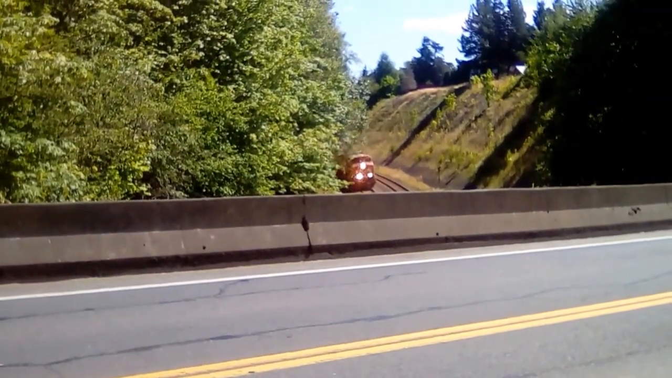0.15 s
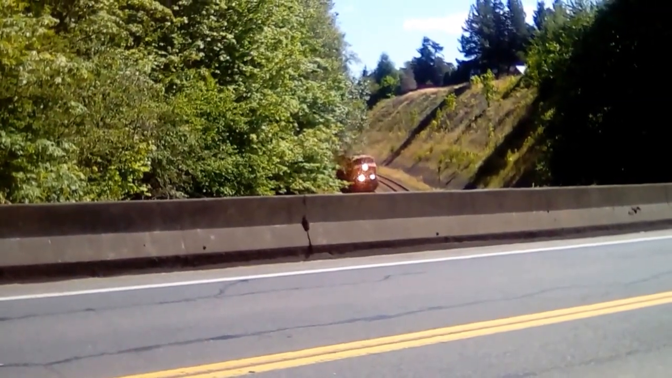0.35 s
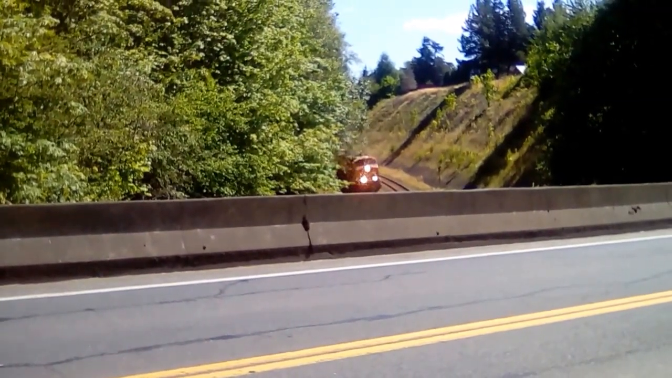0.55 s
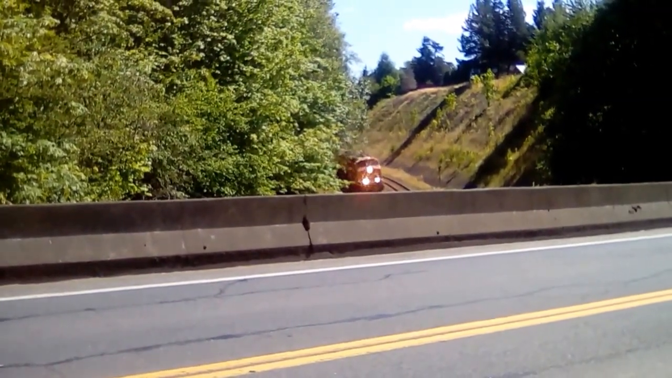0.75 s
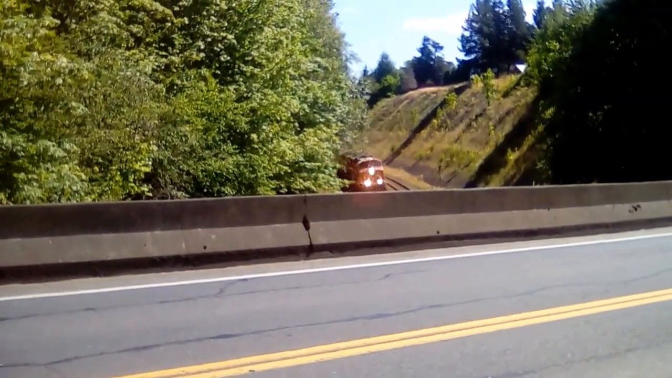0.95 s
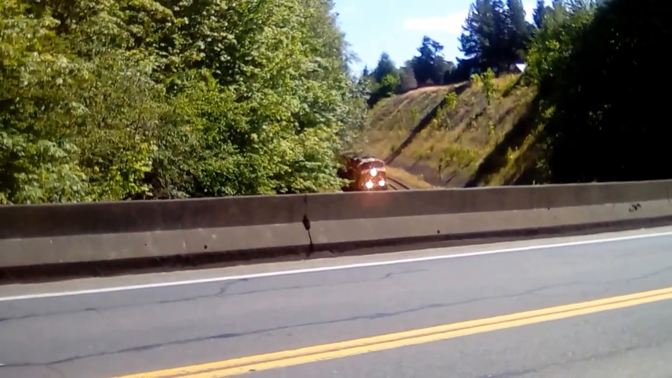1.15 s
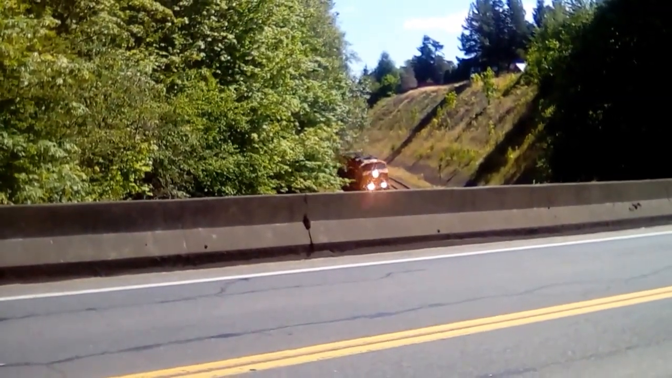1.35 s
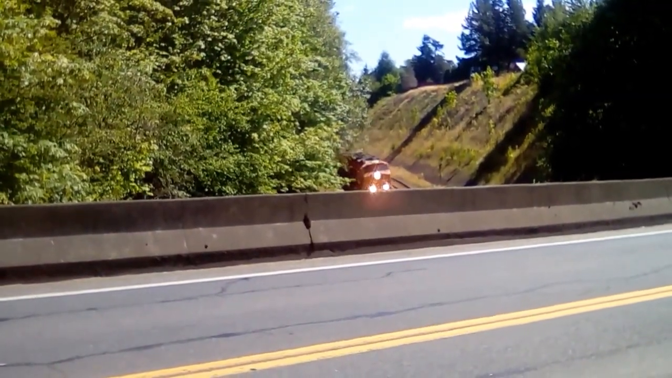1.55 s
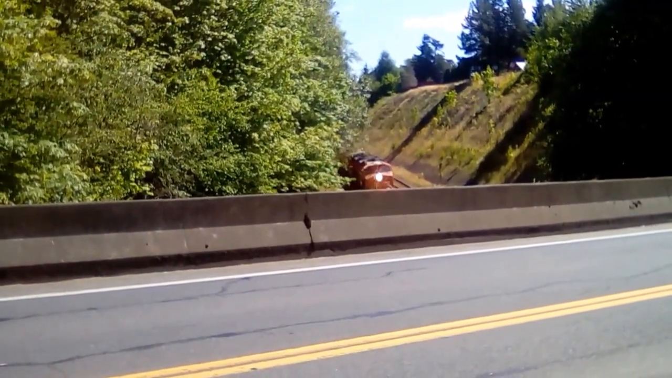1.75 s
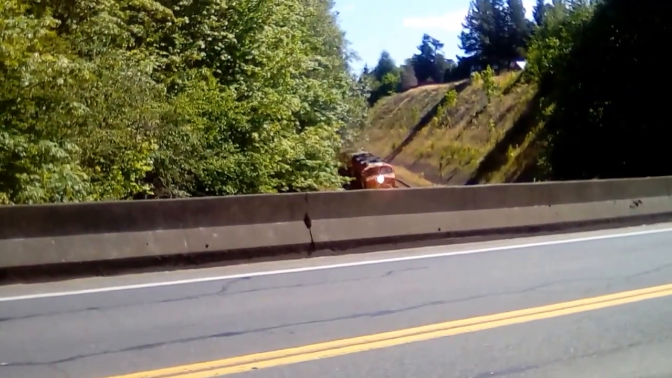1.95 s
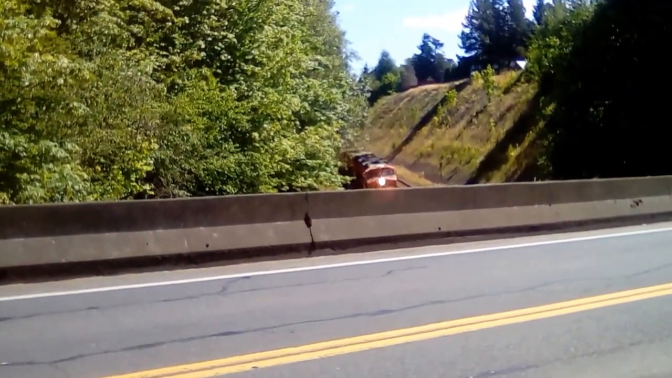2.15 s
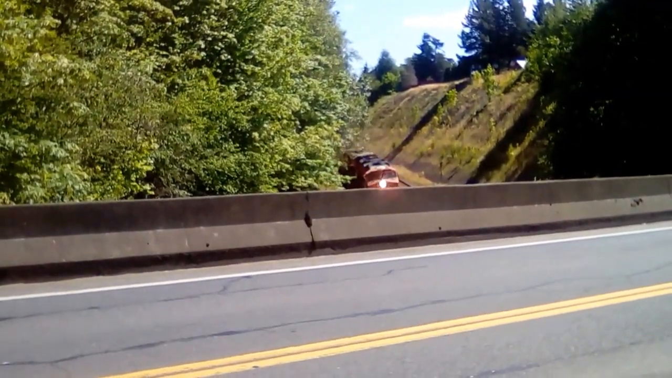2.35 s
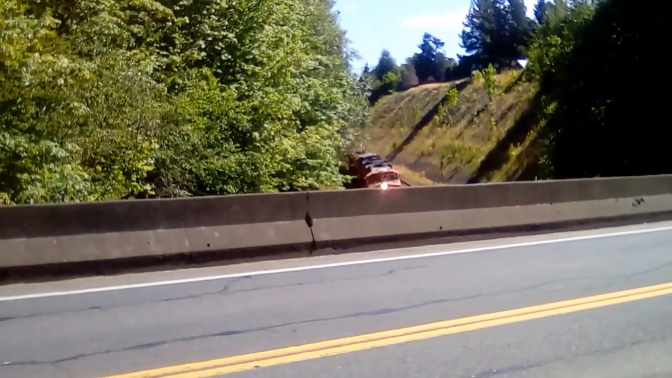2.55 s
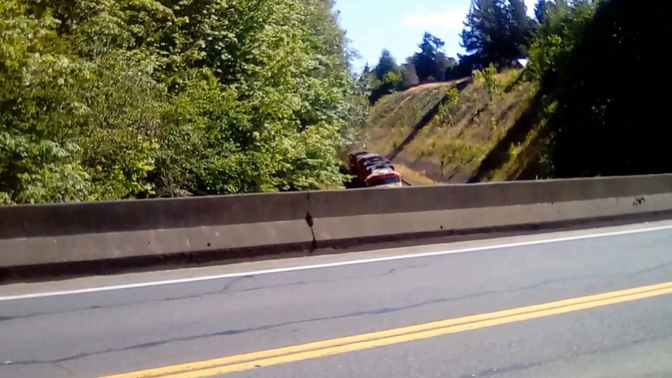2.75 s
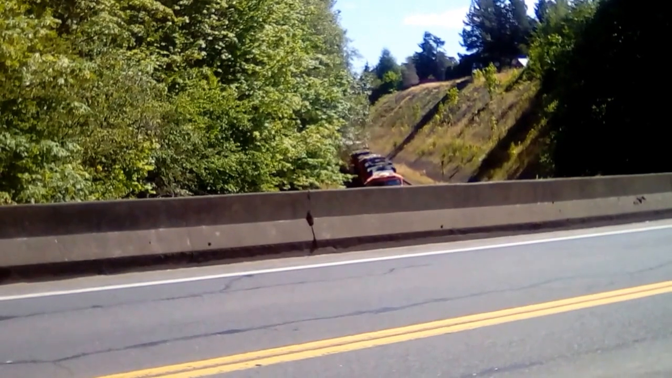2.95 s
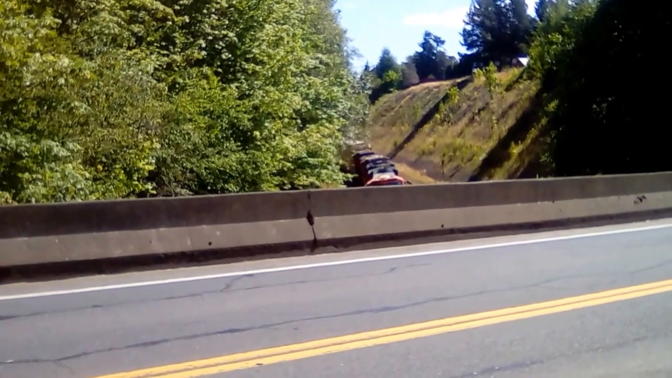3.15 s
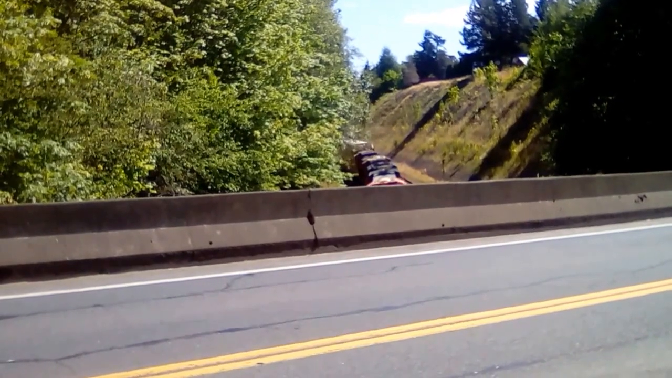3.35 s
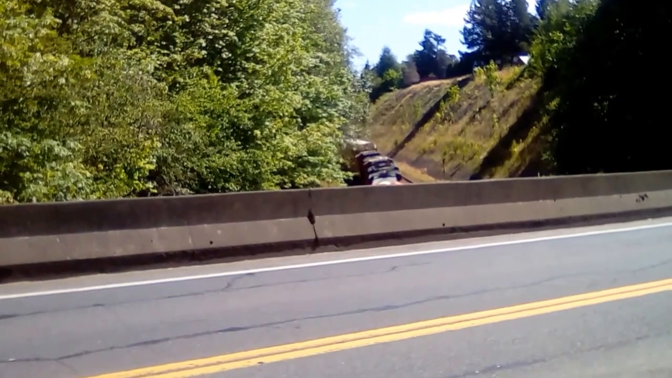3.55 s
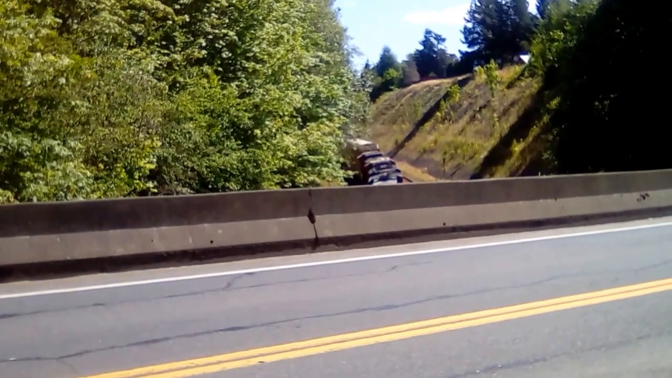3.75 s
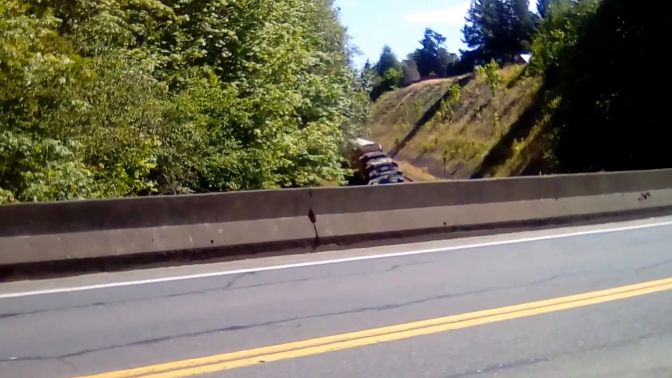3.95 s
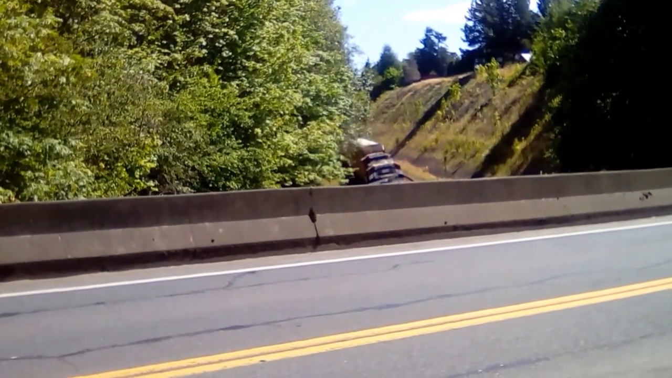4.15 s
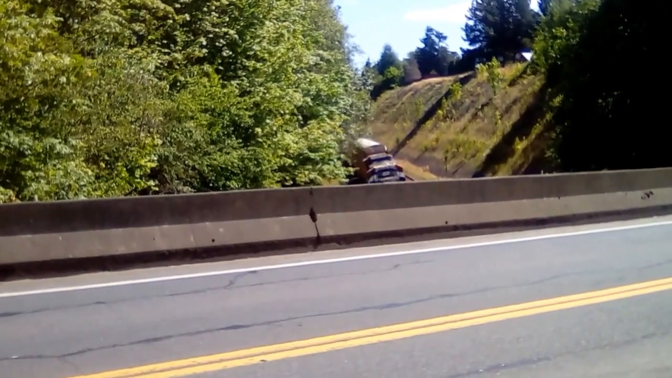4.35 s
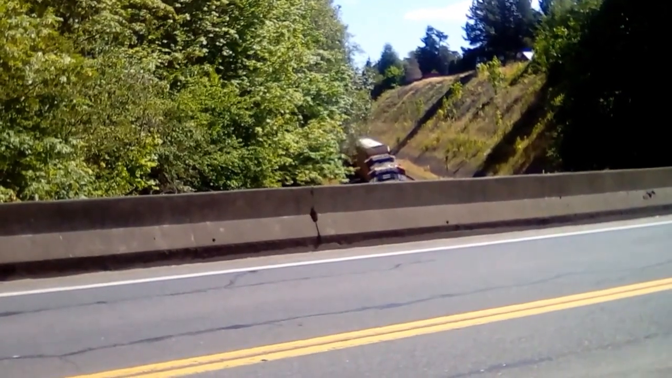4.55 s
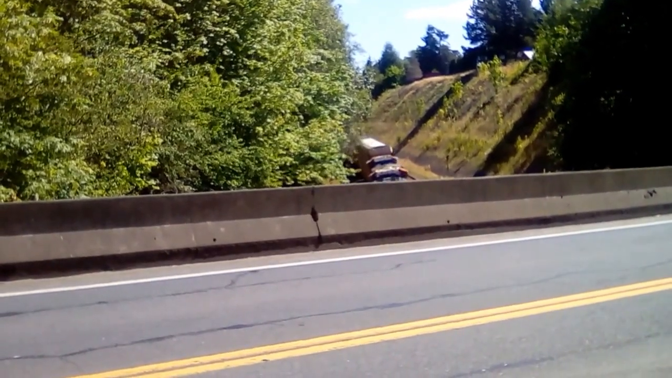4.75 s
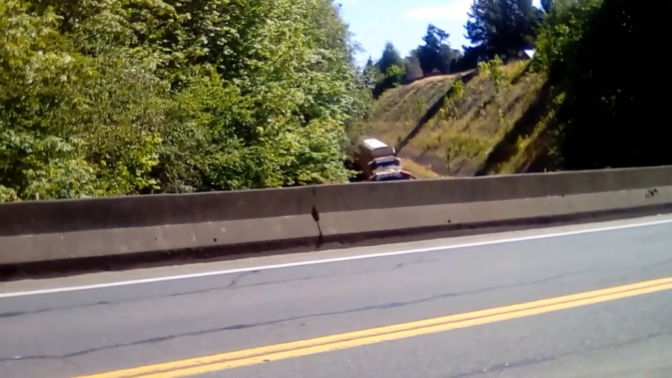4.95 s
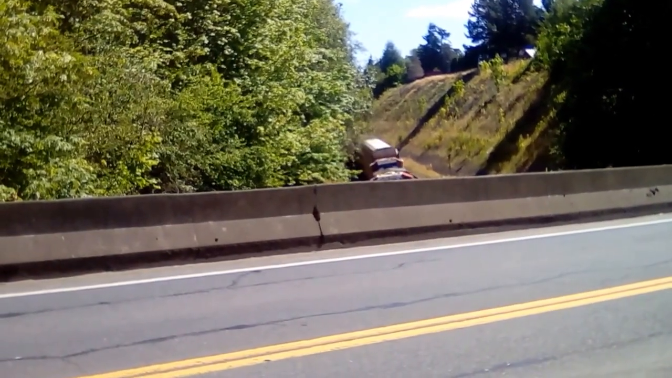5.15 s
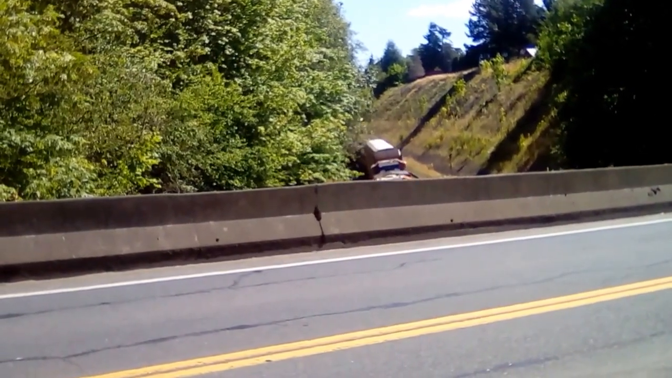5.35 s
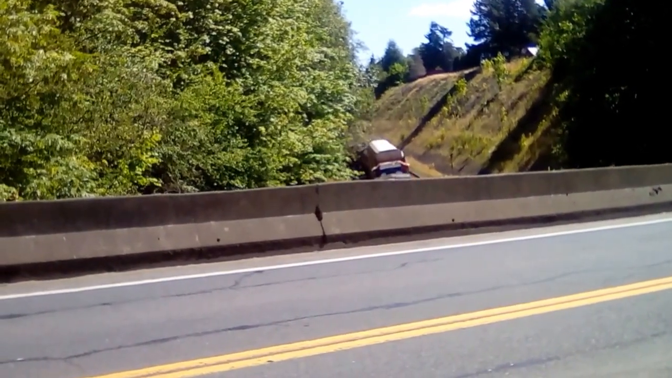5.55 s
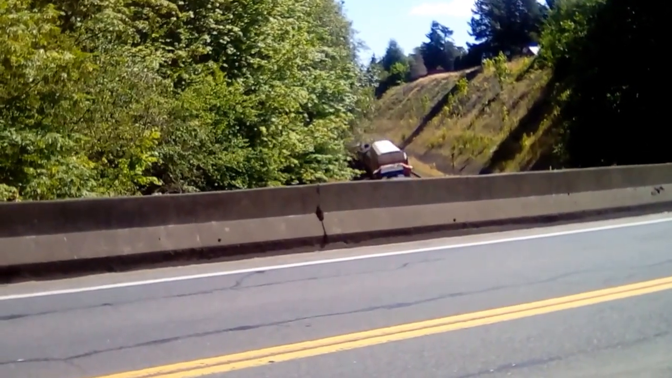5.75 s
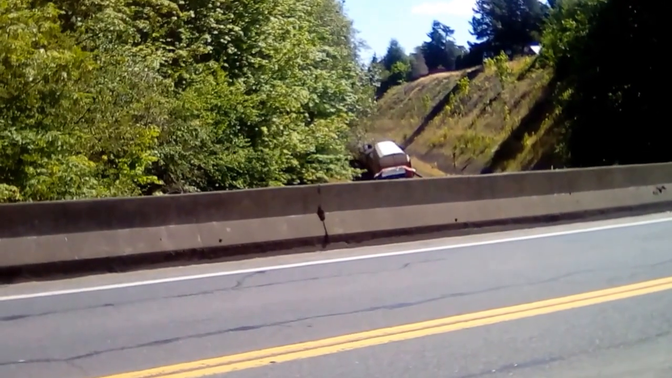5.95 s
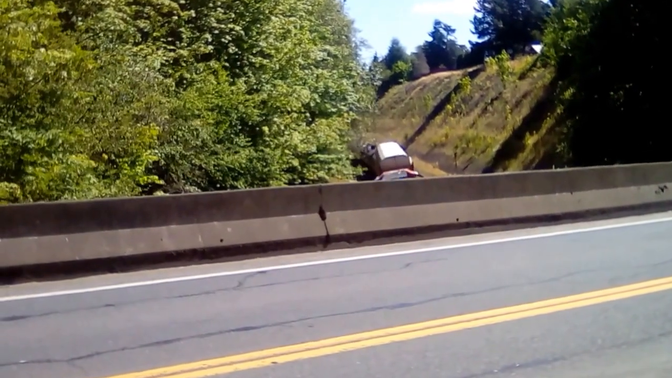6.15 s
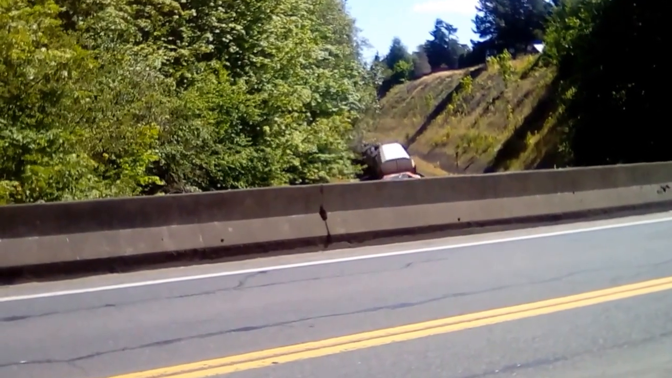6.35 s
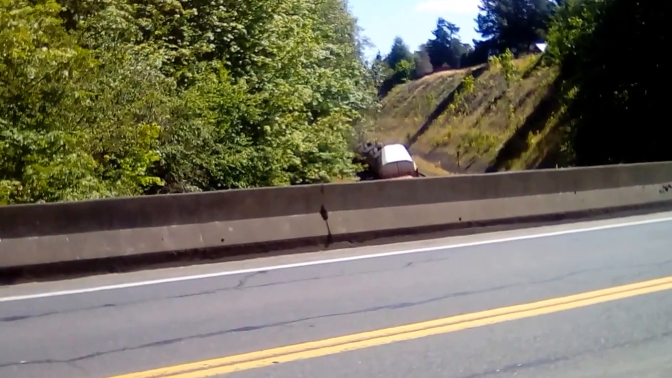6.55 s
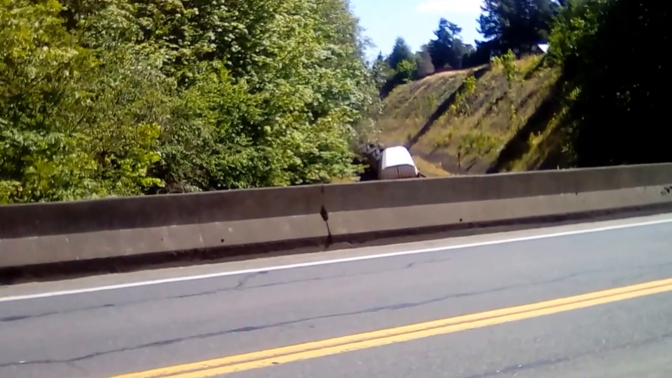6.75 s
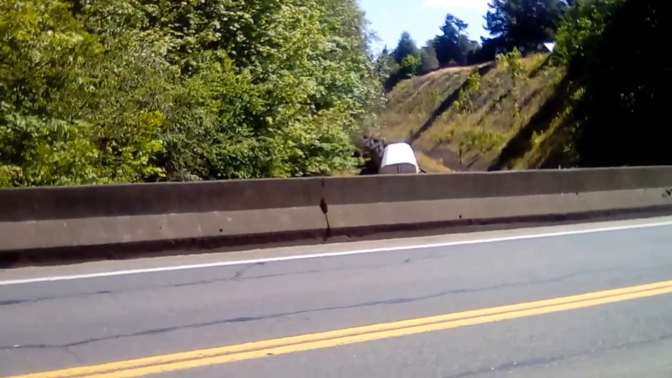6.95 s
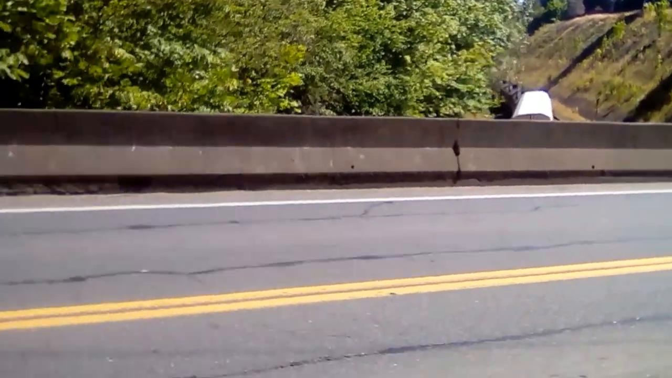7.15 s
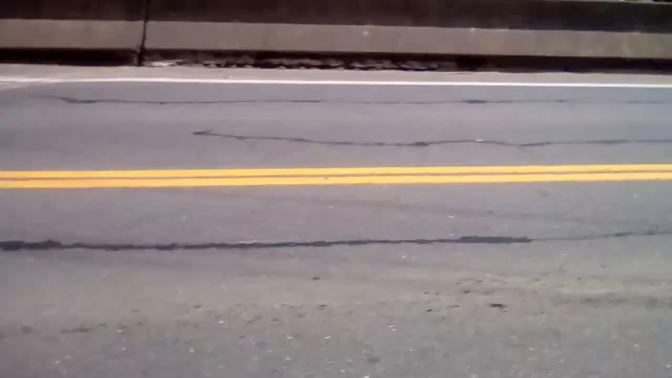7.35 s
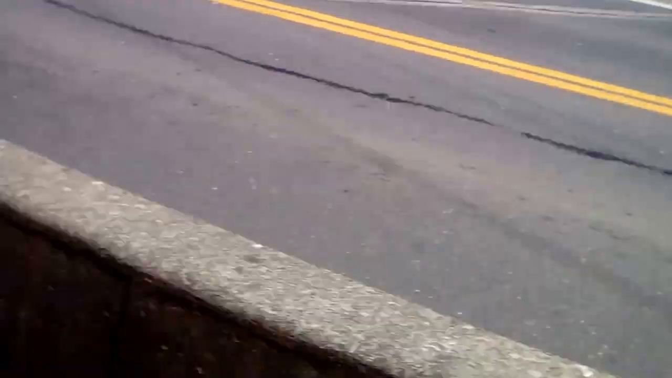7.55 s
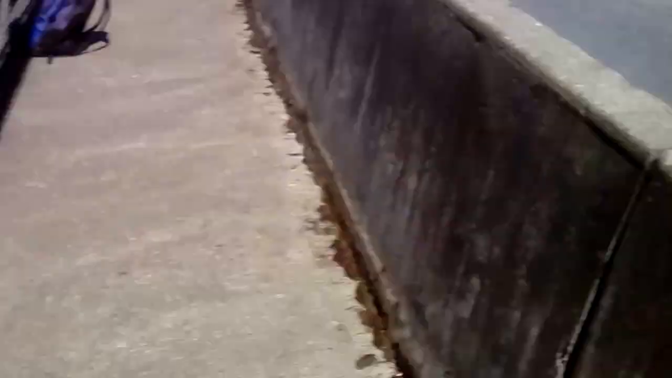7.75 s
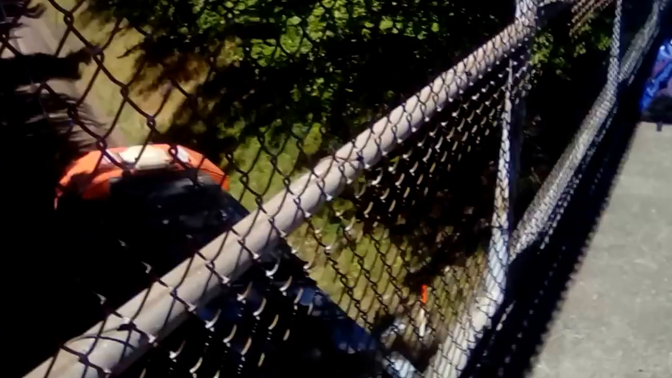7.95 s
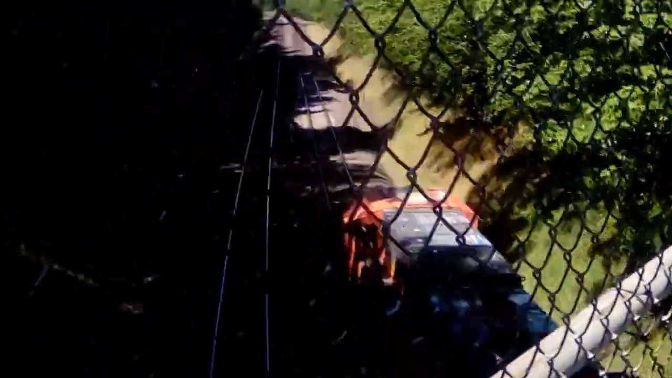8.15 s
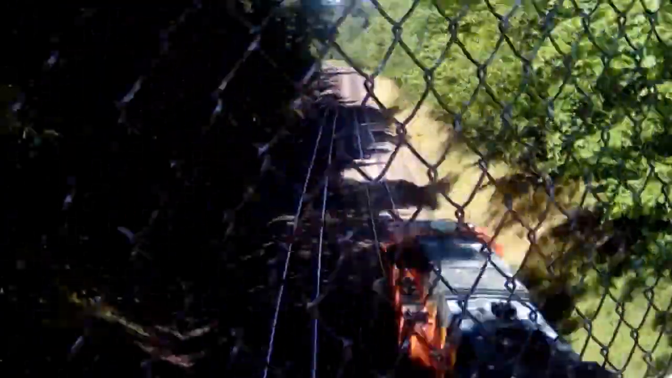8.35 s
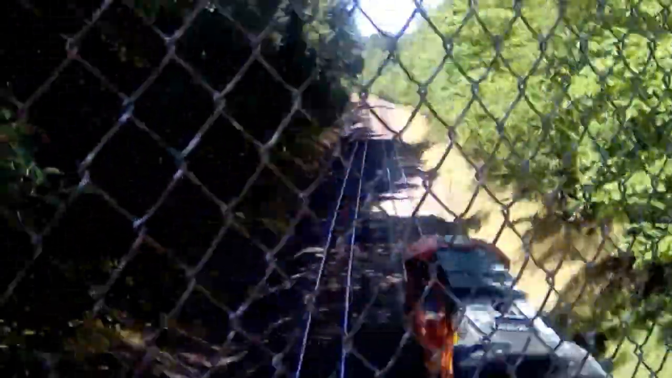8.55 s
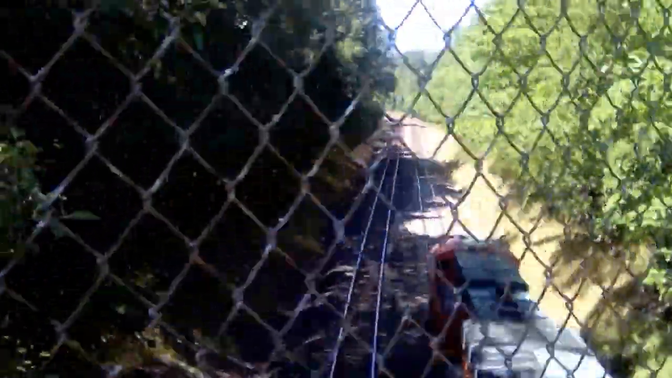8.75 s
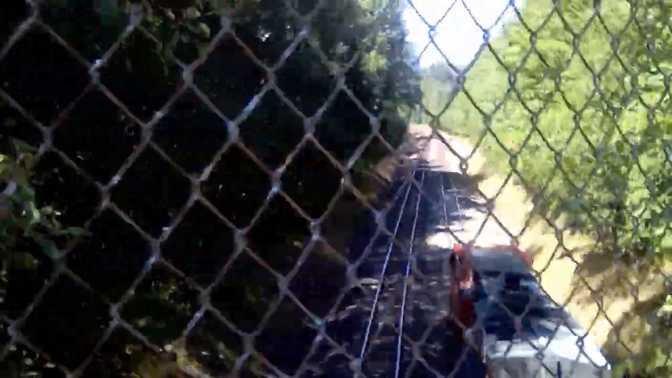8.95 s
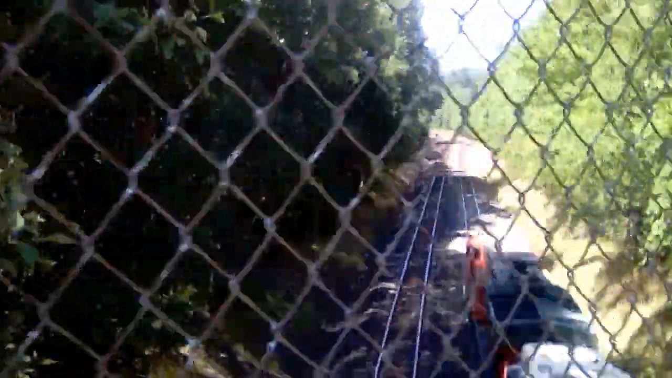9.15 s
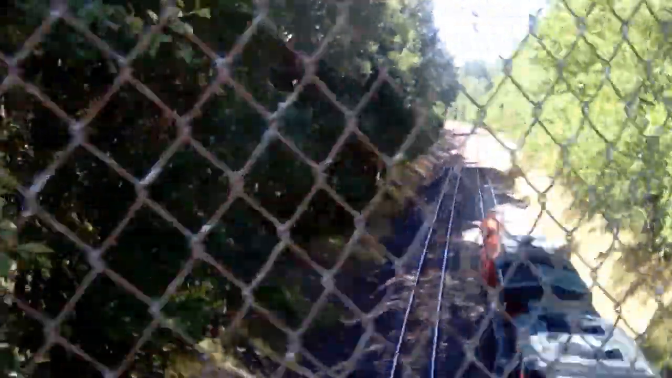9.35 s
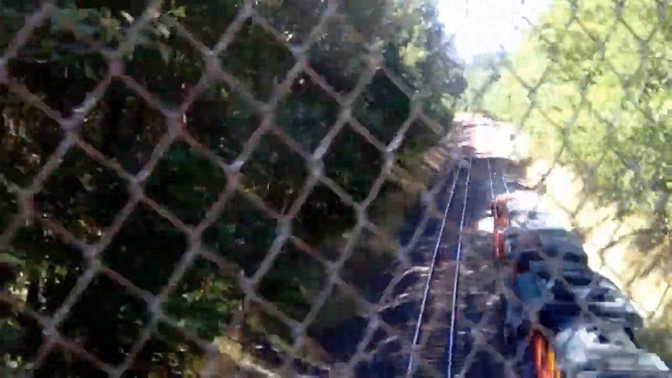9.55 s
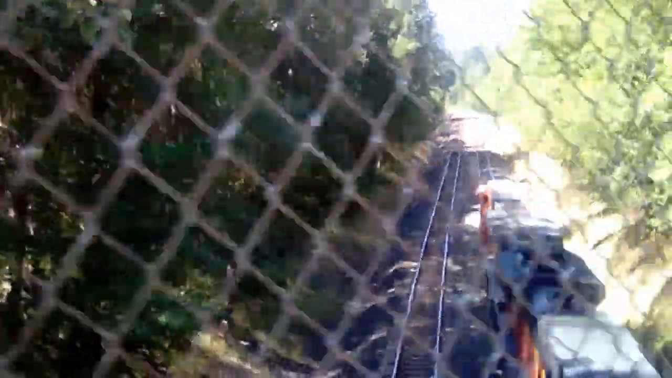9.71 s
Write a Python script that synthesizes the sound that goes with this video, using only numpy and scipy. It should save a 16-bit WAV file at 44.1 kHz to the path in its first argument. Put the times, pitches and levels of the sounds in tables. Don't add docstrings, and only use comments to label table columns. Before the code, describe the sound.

Diesel locomotive approaches with a steady growing drone, then roars beneath a bridge, its pitch sinking amid rumble, bright hiss and brief whines.

```python
import sys
import numpy as np
from scipy import signal
from scipy.io import wavfile
from scipy.ndimage import uniform_filter1d, minimum_filter1d, map_coordinates

SR = 44100
rng = np.random.default_rng(int(sys.argv[2]) if len(sys.argv) > 2 else 0)


def ratio(d):
    e = np.asarray(d, float) / 20
    return 10 ** e


def generate_wav(signal):
    frames = np.transpose(np.atleast_2d(signal))
    scaled = np.clip(frames, -1, 1) * 32767
    pcm = np.round(scaled).astype(np.int16)
    wavfile.write(sys.argv[1], SR, pcm)


N = 435708


def curves(rows):
    s, *columns = np.transpose(rows)
    return [np.interp(np.arange(N) / SR, s, column) for column in columns]


def span(rows, fade_s=0.091):
    t = np.arange(N) / SR
    inside_s = np.minimum(t - rows[0][0], rows[-1][0] - t)
    return np.clip(inside_s / fade_s + 1, 0, 1)


def swells(rows):
    t = np.arange(0, N + 64, 64) / SR
    gain_db = sum(db * np.exp(-((t - s) / width_s) ** 2) for s, db, width_s in rows)
    return np.repeat(gain_db, 64)[:N]


def wobble(rate_hz):
    coarse = np.arange(0, N + 16, 16)
    knots = rng.standard_normal(int(N * rate_hz / SR) + 4)
    smooth = map_coordinates(knots, [coarse * rate_hz / SR])
    return np.interp(np.arange(N), coarse, smooth)


def unit(x):
    return x / np.sqrt(np.mean(x ** 2) + 1e-20)


def rush(spectrum, patchy_db):
    hz, _, z = signal.stft(rng.standard_normal(N), SR, nperseg=2048)
    field = uniform_filter1d(rng.standard_normal(z.shape), size=20, axis=0)
    field = uniform_filter1d(field, size=3, axis=1)
    knot_hz, knot_db = np.transpose(spectrum)
    colour_db = np.interp(np.log(hz + 1), np.log(knot_hz), knot_db, left=-120, right=-120)
    gain = ratio(colour_db[:, None] + patchy_db * unit(field))
    return unit(signal.istft(z * gain, SR, nperseg=2048)[1][:N])


def tone(turns, drift_rad, rate_hz, unsteady_db):
    phase = 2 * np.pi * turns + drift_rad * wobble(rate_hz)
    return np.sqrt(2) * np.sin(phase) * ratio(unsteady_db * wobble(rate_hz))


def band(centre_hz, width_hz):
    phase = 2 * np.pi * np.cumsum(centre_hz + np.zeros(N)) / SR
    return unit(wobble(width_hz) * np.sin(phase) + wobble(width_hz) * np.cos(phase))


# (time [s], rate [Hz])
CYCLE = [(0, 9.283), (4.0, 9.278), (6.0, 9.275), (6.6, 9.232), (6.8, 9.185), (7.0, 9.106), (7.2, 8.946),
         (7.6, 8.975), (7.8, 8.813), (8.0, 8.561), (8.2, 8.422), (8.4, 8.352), (8.8, 8.299), (9.4, 8.332),
         (9.88, 8.332)]
# (time [s], level [dB])
STACK = [(0, -41), (1.35, -36), (2.7, -29.5), (4.5, -26), (5.2, -26), (5.75, -20), (6.3, -18), (7.2, -16.5),
         (8.3, -13.5), (9.3, -17), (9.88, -20)]
# (order [per cycle], level [dB])
LOW_ORDERS = [(2, -20), (5, -17), (7, -12), (8, -9), (10, -4.5), (11, -8), (12, -3), (13, -9)]
HIGH_ORDERS = [(16, -13), (17, -13), (18, -6), (19, -11.5), (20, -10.5), (21, -8.5), (22, -10.5), (24, -16),
               (25, -14), (26, -12.5), (27, -16.5), (30, -18.5)]
OPPOSED_ORDERS = (7, 10, 11, 12, 13, 16, 17, 19)
# (time [s], gain [dB], half width [s])
THIRD_ECHOES = [(7.3, 6, .3), (8.35, 9, .3), (9.3, 9.9, 0.42)]
SIXTH_ECHOES = [(0, 12, 1.6), (3.8, -4, .8), (5.9, 8.5, 0.66), (6.8, -5, .12), (7.08, 8, .12),
                (7.5, -4, .2), (7.94, 9, .17)]
NINTH_ECHOES = [(2.9, -6, .9), (5.1, 4, .5), (6.1, -5, 0.41), (6.65, 5.5, .25), (7.42, 10, 0.043),
                (7.56, 11, .09), (7.8, -1, .1), (8.03, 6, 0.12), (8.5, -3, .18), (8.85, 5, .13),
                (9.45, -18, .27)]
FIFTEENTH_ECHOES = [(2.25, -2.5, 0.36), (6.1, -1, .1), (6.28, 2.5, 0.092), (7.17, 3.5, .08),
                    (7.36, -5, 0.047), (7.6, -8.5, 0.14), (8.05, -3, 0.057), (8.76, -4, 0.13),
                    (9.6, -4, 0.099)]
LOW_ECHOES = [(1.2, -12, 1.2), (5.6, -6, .3), (7.9, 5, 0.28)]
HIGH_ECHOES = [(1.8, 3, 1.3), (3.8, -1.5, 0.57), (6.55, 3.5, 0.69), (7.25, -8.5, 0.14), (7.62, -10, 0.083),
               (7.83, -7, 0.1), (9.04, -14, 0.069), (9.8, -17, .5)]


def exhaust():
    stack_db, = curves(STACK)
    third_db = stack_db - 25 + swells(THIRD_ECHOES)
    sixth_db = stack_db - 16 + swells(SIXTH_ECHOES)
    ninth_db = stack_db - 7 + swells(NINTH_ECHOES)
    fifteenth_db = stack_db + swells(FIFTEENTH_ECHOES)
    low_db = stack_db - 10.5 + swells(LOW_ECHOES)
    high_db = stack_db - 3.5 + swells(HIGH_ECHOES)
    cycle_turns = np.cumsum(curves(CYCLE)[0]) / SR

    def order_turns(order):
        scatter = rng.normal(0, .06 if order < 22 else .5)
        return order * cycle_turns + (order in OPPOSED_ORDERS) / 2 + scatter

    strong_orders = ((6, sixth_db), (9, ninth_db), (15, fifteenth_db), (14, fifteenth_db - 10), (3, third_db))
    strong = sum(ratio(db) * tone(order_turns(k), .15, 2, .4) for k, db in strong_orders)
    low = sum(ratio(db) * tone(order_turns(k), .3, 2, 2) for k, db in LOW_ORDERS)
    high = sum(ratio(db) * tone(order_turns(k), k / 25, 3, 2.5) for k, db in HIGH_ORDERS)
    return strong + ratio(low_db) * low + ratio(high_db) * high


# (time [s], level [dB], brightness [dB])
BODY = [(0, -53, -3.5), (1.15, -50, -1.5), (2.86, -46, 0), (4.43, -41, 2), (5.94, -36, 5.5),
        (6.5, -34, 4.5), (7.2, -34, 2), (7.5, -32, 1), (8.03, -31, -0.5), (8.2, -27, 2), (8.5, -26, 2.5),
        (8.7, -25, 3), (9.1, -26.5, 2.5), (9.5, -29, 3), (9.88, -28.5, 0.5)]
# (time [s], gain [dB], half width [s])
PUFFS = [(4.59, 1, .06), (7.07, 1.5, 0.041), (7.38, 2, 0.12), (7.65, 2.5, 0.02), (7.82, -2, .03),
         (7.92, 0.5, 0.028), (8.2, 0.5, 0.026), (8.38, 0.5, .05), (9.19, 2.5, 0.037), (9.27, 2.5, 0.019)]
# (time [s], gain [dB], half width [s])
STRONG_PUFFS = [(8.655, 4.5, .03), (8.93, 4.5, .02)]
# (time [s], gain [dB], half width [s])
AIR_SHADES = [(0, -14, .9), (2.5, 3.5, 2.1), (7.85, -8, 0.22), (8.6, -4, 0.37), (9.8, -24, 0.62)]
# (frequency [Hz], density [dB per Hz])
RUMBLE = [(20, -15), (42, -9.5), (100, -3.5), (200, -1), (280, -1), (320, -8), (420, -11), (520, -8.5),
          (630, -10.5), (710, -14), (1000, -44)]
ENGINE_ROOM = [(500, -42), (750, -1), (1000, -1.5), (1170, -0.5), (1270, -0.5), (1400, -3), (1600, -3.5),
               (2000, -4.5), (2800, -7.5), (3600, -19)]
HISS = [(1530, -7.5), (2600, -8.5), (3220, -2.5), (6350, 3), (7240, -0.5), (7900, -11.5), (9000, -20),
        (11700, -35), (19800, -120)]
AIR = [(6000, -30), (8500, 4), (10500, -1), (12500, -5), (15600, -18)]


def roar():
    near_db, bright_db = curves(BODY)
    room_db = near_db + swells(PUFFS) + swells(STRONG_PUFFS)
    rumble_db = near_db[0] + 11 + 0.9 * (near_db - near_db[0])
    hiss_db = room_db + bright_db + .4 * wobble(30)
    air_db = hiss_db - 17 + swells(AIR_SHADES)
    flutter = wobble(9) + wobble(22)
    swing = ratio(swells([(7.7, 5.8, 0.3)]))
    rumble = ratio(rumble_db + 0.62 * flutter * swing) * rush(RUMBLE, patchy_db=1.0)
    room = ratio(room_db + 1.5 + 0.17 * flutter) * rush(ENGINE_ROOM, patchy_db=0.4)
    hiss = ratio(hiss_db + 4.5 + 0.21 * flutter) * rush(HISS, patchy_db=0.6)
    air = ratio(air_db + 0.56 * flutter) * rush(AIR, patchy_db=-1.0)
    return rumble + room + hiss + air


# (time [s], centre [Hz], level [dB])
BOOM = [(5.5, 340.2, -52), (7.2, 342.7, -31), (7.55, 349.2, -30.5), (7.68, 360, -21.5), (7.9, 343.5, -27),
        (8.5, 338, -28.5), (8.8, 470.4, -22.5), (9.45, 335.5, -25.5), (9.88, 328.4, -32)]
# (time [s], frequency [Hz], level [dB])
SCOOP = [(7.64, 82, -24), (7.72, 94, -18), (7.82, 108, -19), (7.92, 114, -25)]


def bridge():
    boom_hz, boom_db = curves(BOOM)
    scoop_hz, scoop_db = curves(SCOOP)
    boom = span(BOOM) * ratio(boom_db) * band(boom_hz, width_hz=200)
    scoop = span(SCOOP) * ratio(scoop_db) * tone(np.cumsum(scoop_hz) / SR, .5, 10, 1)
    return boom + scoop


# (time [s], level [dB])
MOTORS = [(0.0, -53), (2.2, -51), (4.2, -44), (5.2, -42), (6.5, -37.5), (7.5, -37), (7.85, -38)]


def motors():
    whine = band(1268 + 9 * wobble(1.6), width_hz=135)
    level_db = curves(MOTORS)[0] - 1.0 + .8 * wobble(3)
    return span(MOTORS, fade_s=0.27) * ratio(level_db) * whine


def doppler(speed_mps, nearest_s, nearest_m):
    along_m = speed_mps * (np.arange(N) / SR - nearest_s)
    receding_mps = along_m / np.hypot(along_m, nearest_m) * speed_mps
    return 1 / (1 + receding_mps / 343)


# (time [s], gain [dB], half width [s])
THIRD_MESH_SWELLS = [(8.02, 6, .03), (8.11, 8, .03), (8.26, 13, .03), (8.39, 9, .05), (8.58, 14, .04),
                     (8.65, 16, .05), (8.8, 8, .07)]
SECOND_MESH_SWELLS = [(8.35, 10, 0.24), (8.76, 9, 0.12)]


def gears():
    mesh_hz = 416.3 * doppler(speed_mps=20.26, nearest_s=7.79, nearest_m=10.05)
    turns = np.cumsum(mesh_hz) / SR
    third_db = -39 + swells(THIRD_MESH_SWELLS)
    second_db = -46 + swells(SECOND_MESH_SWELLS)
    third = ratio(third_db) * tone(3 * turns, .3, 10, 1)
    second = ratio(second_db) * tone(2 * turns, .7, 14, 3)
    fourth = ratio(third_db - 13) * tone(4 * turns, 2, 60, 3)
    return span([(7.85,), (8.95,)]) * (third + second + fourth)


# (time [s], frequency [Hz], level [dB])
HOWL = [(8.55, 1020, -40), (8.68, 1003, -27), (8.9, 995, -32), (9.1, 975, -37), (9.4, 945, -35),
        (9.6, 935, -42)]


def fan():
    fan_hz, fan_db = curves(HOWL)
    return span(HOWL) * ratio(fan_db) * tone(np.cumsum(fan_hz) / SR, 2, 50, 2.5)


# (time [s], level [dB])
TURBO = [(0.5, -74), (1.9, -60), (5.3, -42), (5.45, -36), (6.5, -41), (6.72, -45)]


def turbocharger():
    t = np.arange(N) / SR
    pair = tone(7096 * t, 1.1, 22, 2) + ratio(-3) * tone(7068 * t, 1.1, 22, 2)
    return span(TURBO) * ratio(curves(TURBO)[0] - 3.5) * pair


# (time [s], level [dB])
NEARING_GEAR = [(3.7, -59), (5.3, -54), (6.6, -51)]


def nearing_gear():
    t = np.arange(N) / SR
    return span(NEARING_GEAR) * ratio(curves(NEARING_GEAR)[0]) * tone(880 * t, 1, 12, 4)


# (time [s], level [dB])
INSECTS = [(0.0, -58), (1.28, -53), (3.1, -53), (5.0, -44)]
# (time [s], gain [dB], half width [s])
INSECT_PAUSE = [(3.28, -17, .07)]
# (frequency [Hz], density [dB per Hz])
BUZZ = [(5650, -40), (5790, -3), (6150, -1), (6420, 0), (6530, -4), (6700, -40)]


def insects():
    buzz = ratio(.6 * wobble(14)) * rush(BUZZ, patchy_db=1)
    level_db = curves(INSECTS)[0] + swells(INSECT_PAUSE) + 5.0
    return span(INSECTS, fade_s=0.93) * ratio(level_db) * buzz


def scene():
    whines = motors() + gears() + fan() + turbocharger() + nearing_gear()
    return np.tile(exhaust() + roar() + bridge() + whines + insects(), (2, 1))


# (time [s], peak [dB])
TICKS = [(8.1412, -31), (8.1582, -29), (8.1702, -26), (8.2255, -30), (8.2898, -29), (8.3238, -30),
         (8.3572, -30), (8.444, -31), (8.459, -28), (8.6201, -28), (8.6755, -26), (8.7399, -31),
         (8.7693, -28), (8.8456, -28), (8.896, -28), (8.9704, -26)]


def ticks():
    count = 40
    weak = np.c_[rng.uniform(8.14, 9.02, count), rng.normal(-37, 2.5, count)]
    s, db = np.r_[TICKS, weak].T
    spikes = np.bincount(np.round(s * SR).astype(int), ratio(db + 8), minlength=N)
    return np.convolve(spikes, [-.4, 1, -.6], "same")


def limited(x, top, release):
    need = np.minimum(1, top / np.abs(x + 1e-9))
    held = minimum_filter1d(need, size=release, origin=(release - 1) // 2)
    return x * np.minimum(need, uniform_filter1d(held, size=release // 2, origin=0))


def low_pass(x):
    return signal.sosfilt(signal.butter(12, 15730, fs=SR, output="sos"), x)


# (frequency [Hz], level [dB])
CIRCUIT = [(9119, -76), (9570, -78), (9884, -77), (11090, -79), (11825, -78), (12215, -78), (13130, -80),
           (13340, -76), (14147, -75)]
# (frequency [Hz], density [dB per Hz])
SELF_NOISE = [(200, -7), (7000, -37), (9000, 8), (13500, 16), (15700, 8)]


def record(dry):
    t = np.arange(N) / SR
    power = uniform_filter1d(dry[0] ** 2, size=SR // 2)
    loud_db = 10 * np.log10(np.abs(power) + 1e-9)
    duck = ratio(-1.1 * np.maximum(loud_db + 15, 0))
    tones = sum(ratio(db - 2) * tone(hz * t, 1.1, 14, 3) for hz, db in CIRCUIT)
    hiss = ratio(-62) * rush(SELF_NOISE, patchy_db=.4)
    x = dry[0] + duck * (tones + hiss)
    x = limited(x, top=.705, release=41) + ticks()
    return low_pass(np.tile(x, (2, 1)))


dry = scene()
out = record(dry)
generate_wav(out)
```